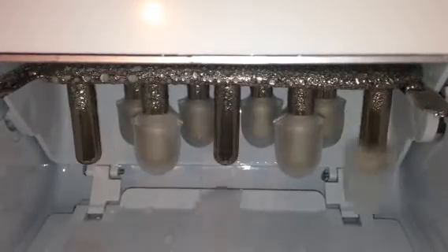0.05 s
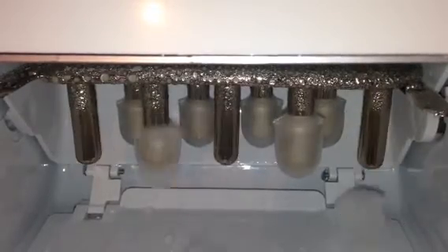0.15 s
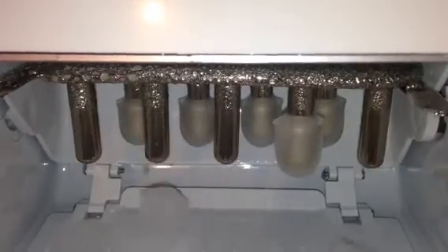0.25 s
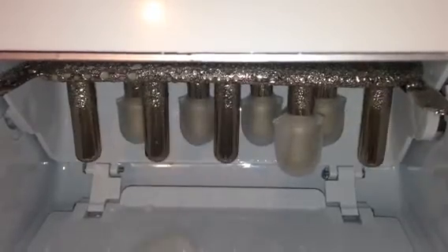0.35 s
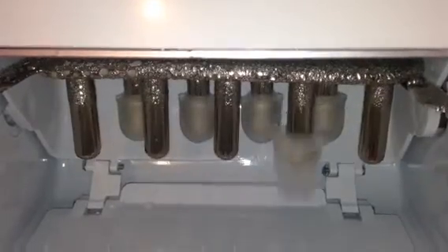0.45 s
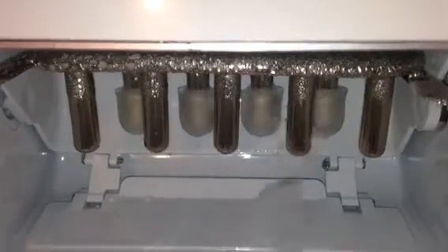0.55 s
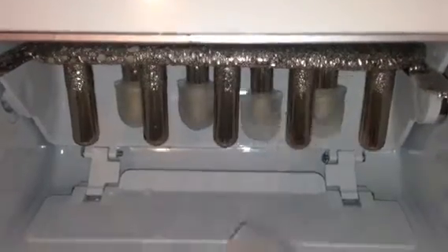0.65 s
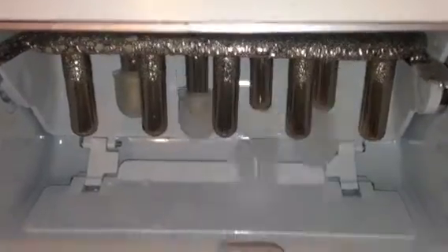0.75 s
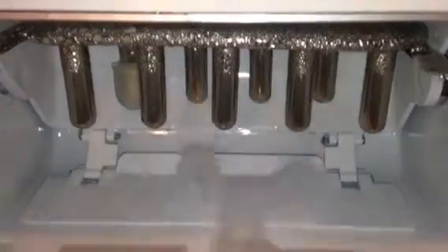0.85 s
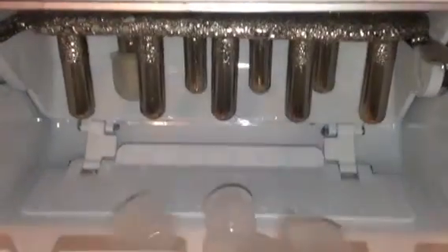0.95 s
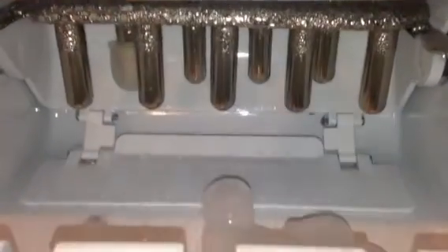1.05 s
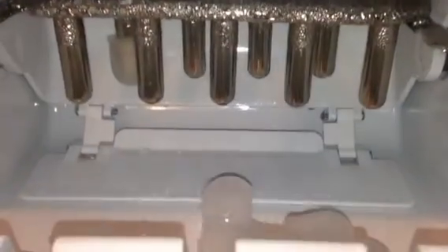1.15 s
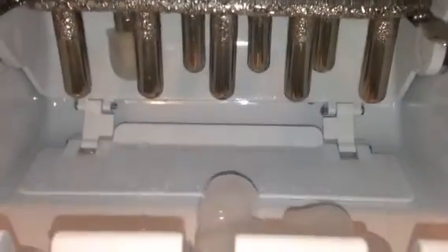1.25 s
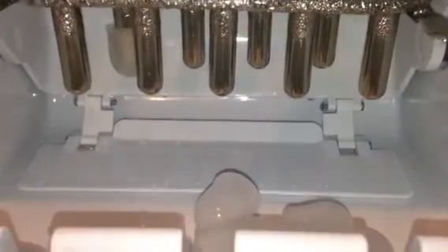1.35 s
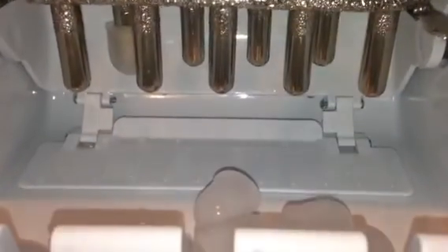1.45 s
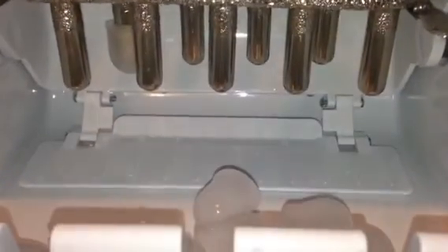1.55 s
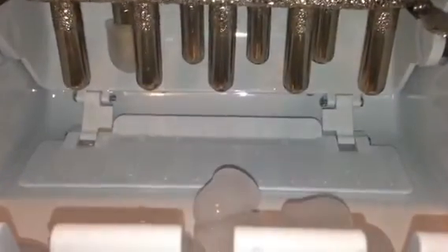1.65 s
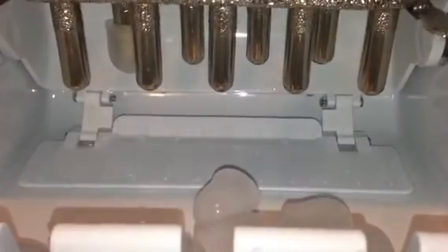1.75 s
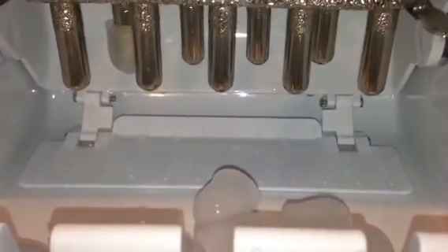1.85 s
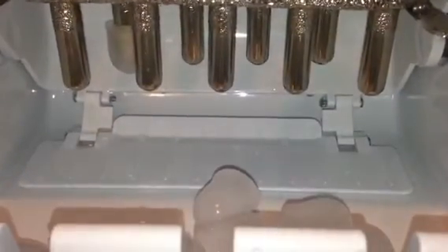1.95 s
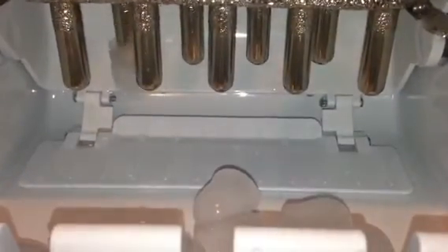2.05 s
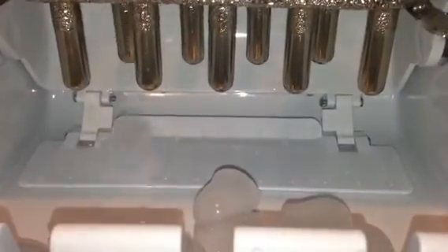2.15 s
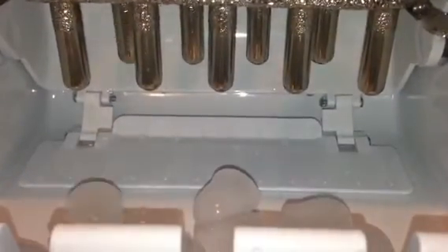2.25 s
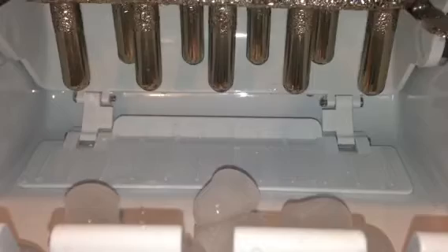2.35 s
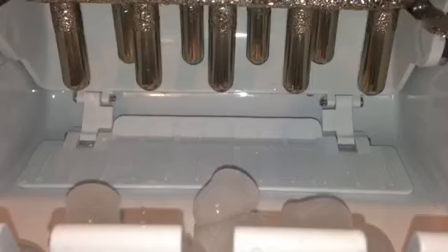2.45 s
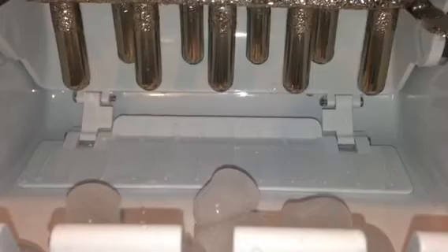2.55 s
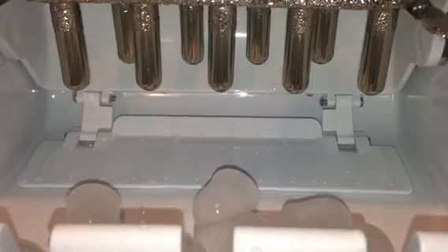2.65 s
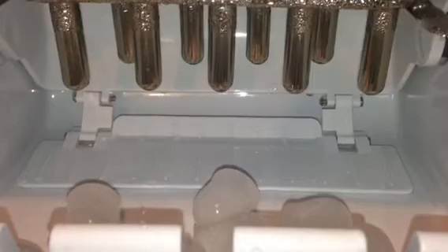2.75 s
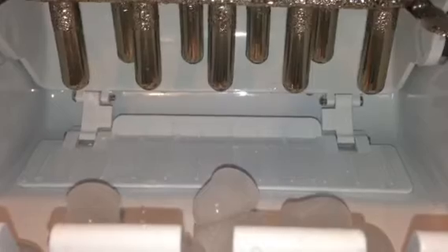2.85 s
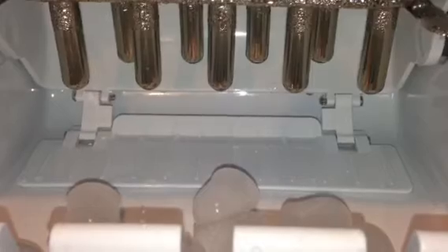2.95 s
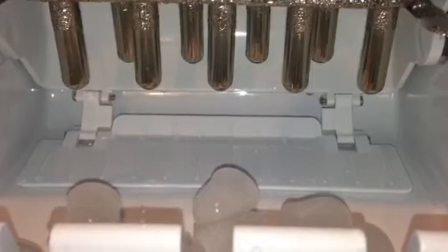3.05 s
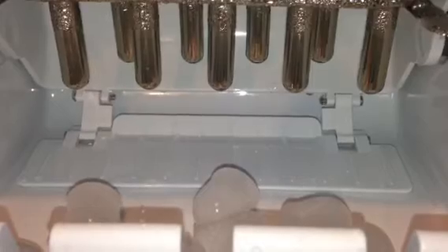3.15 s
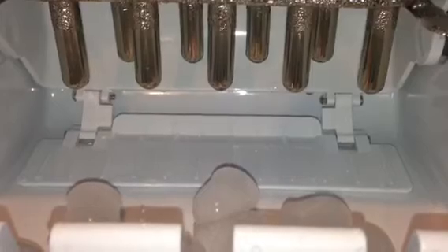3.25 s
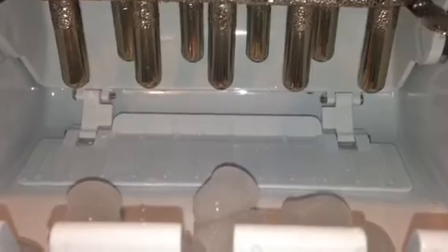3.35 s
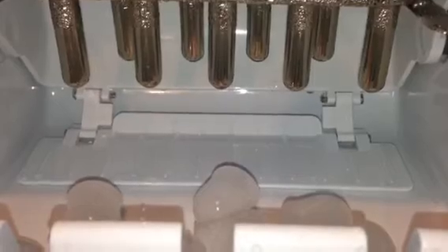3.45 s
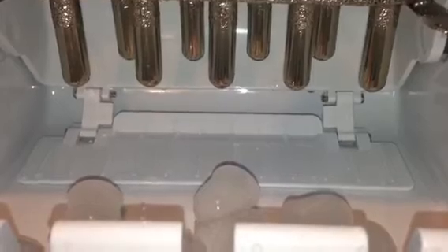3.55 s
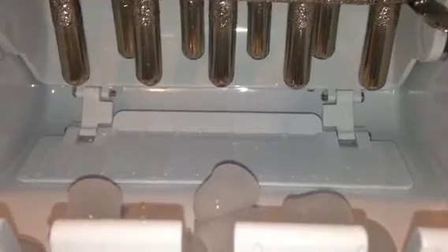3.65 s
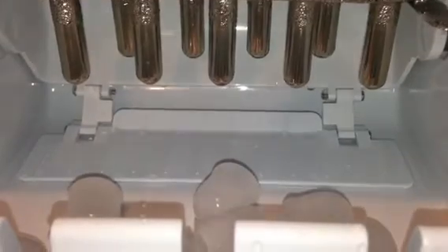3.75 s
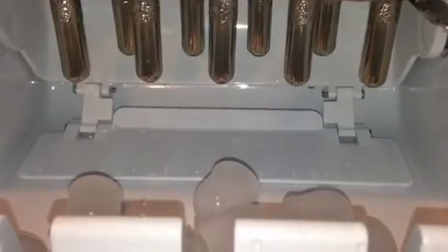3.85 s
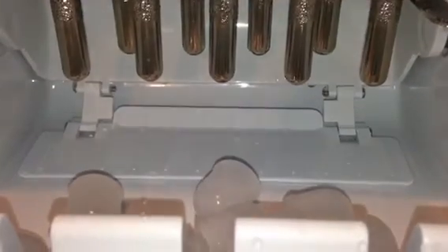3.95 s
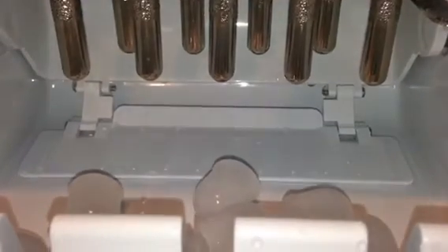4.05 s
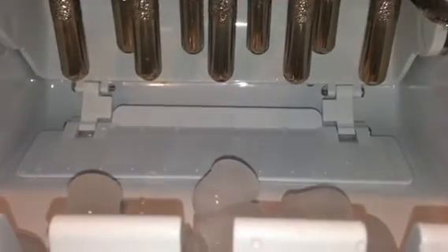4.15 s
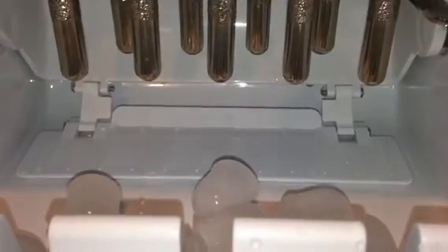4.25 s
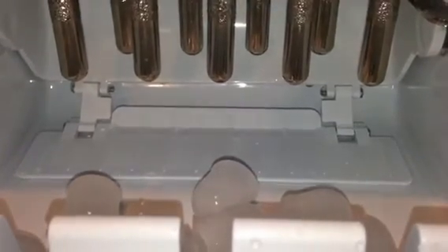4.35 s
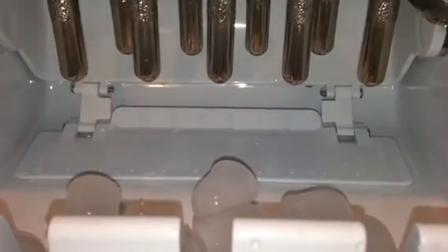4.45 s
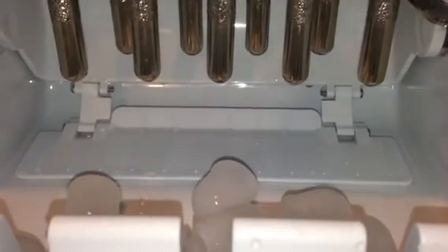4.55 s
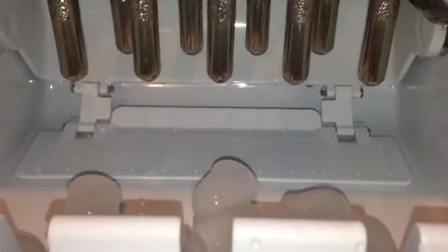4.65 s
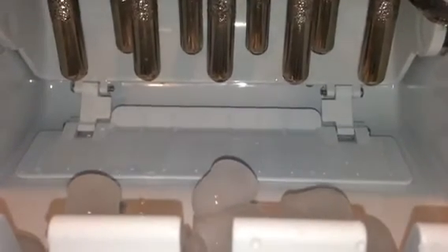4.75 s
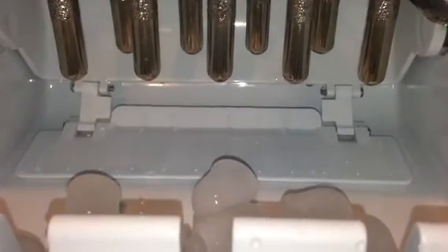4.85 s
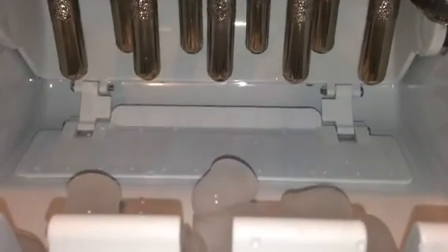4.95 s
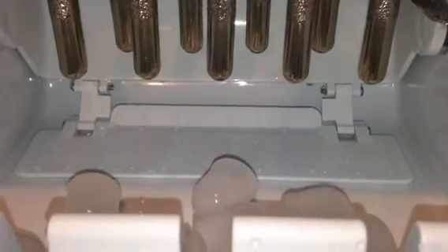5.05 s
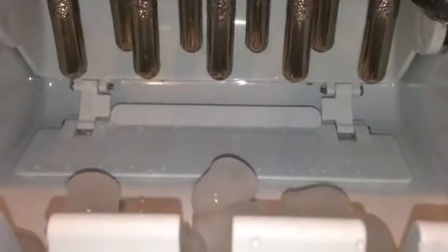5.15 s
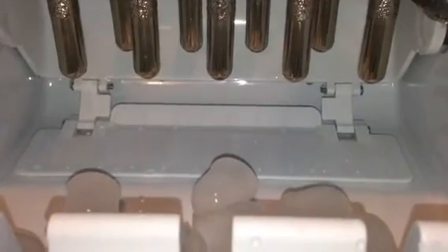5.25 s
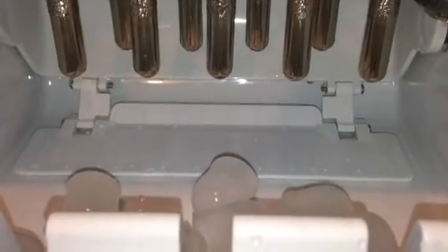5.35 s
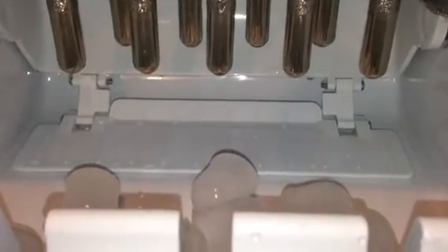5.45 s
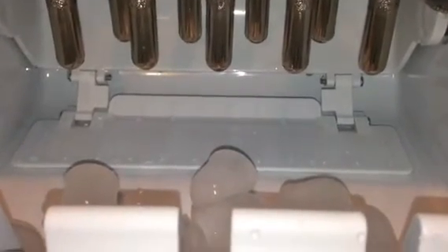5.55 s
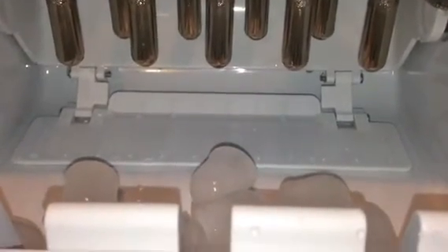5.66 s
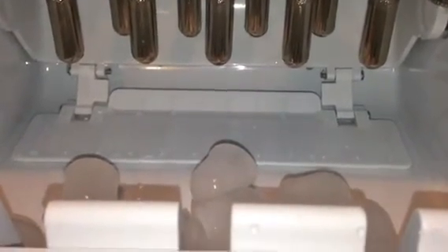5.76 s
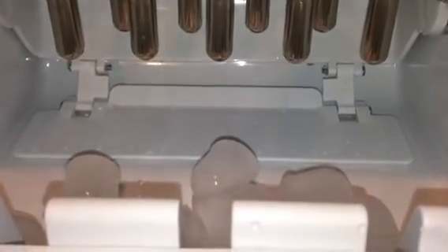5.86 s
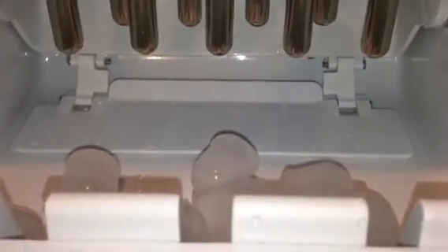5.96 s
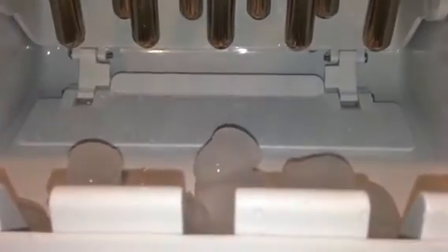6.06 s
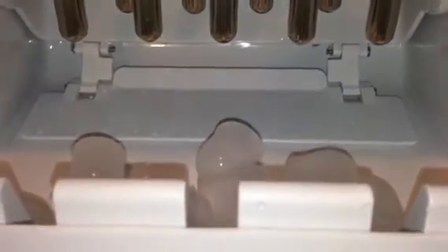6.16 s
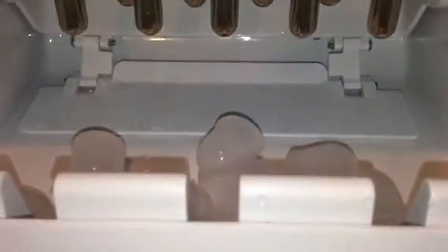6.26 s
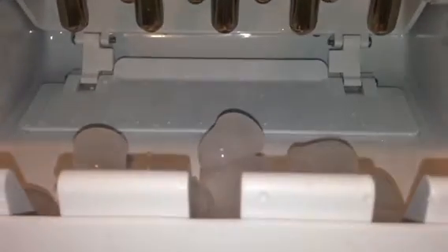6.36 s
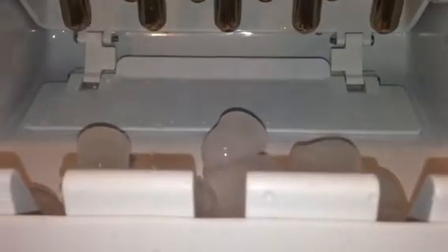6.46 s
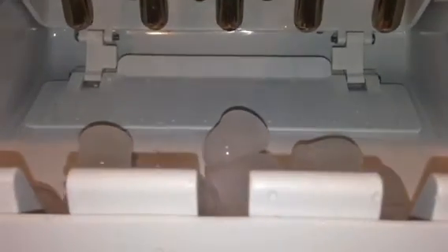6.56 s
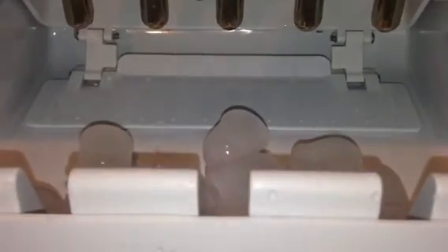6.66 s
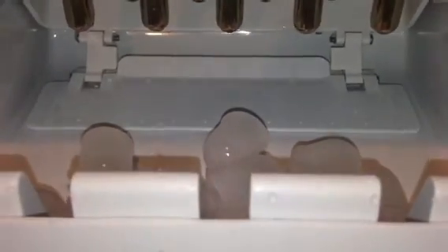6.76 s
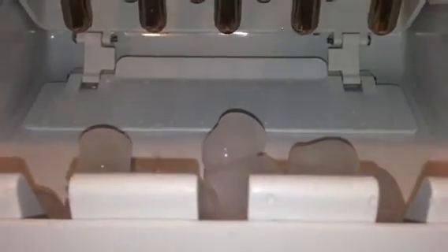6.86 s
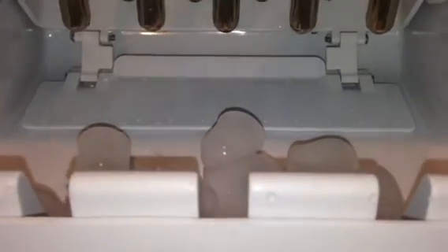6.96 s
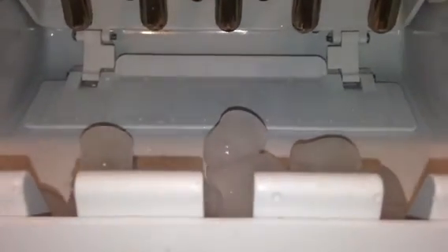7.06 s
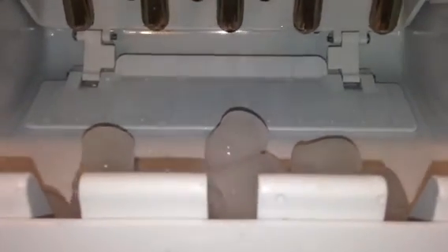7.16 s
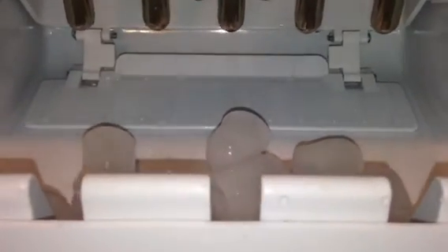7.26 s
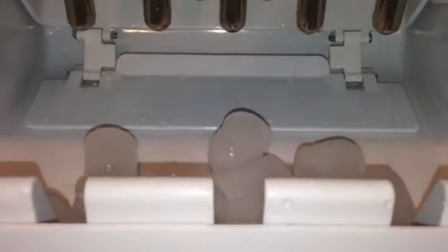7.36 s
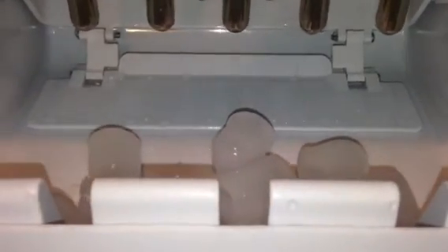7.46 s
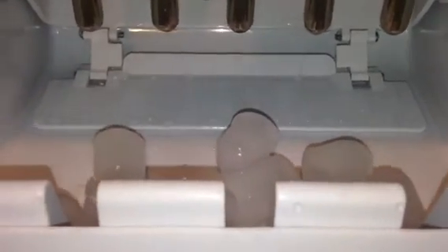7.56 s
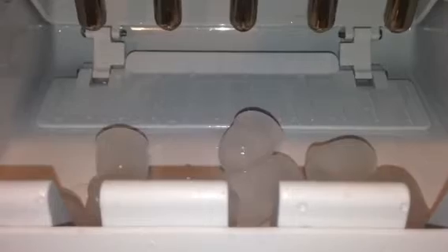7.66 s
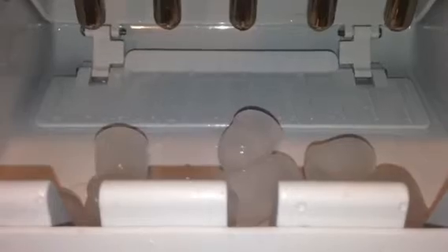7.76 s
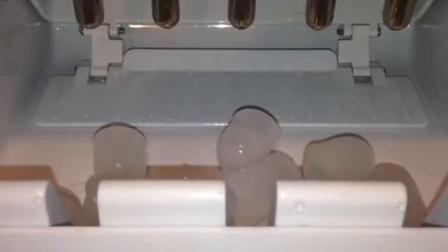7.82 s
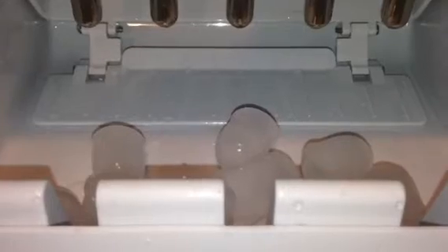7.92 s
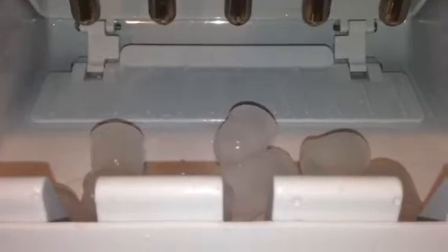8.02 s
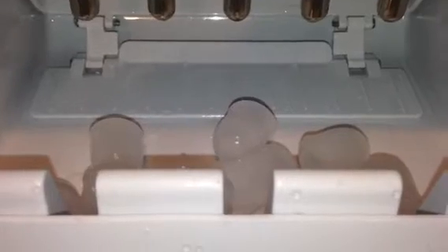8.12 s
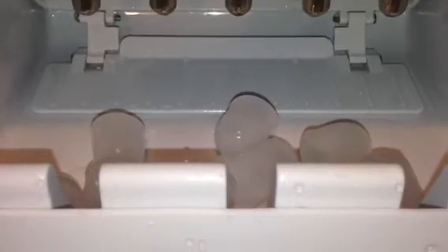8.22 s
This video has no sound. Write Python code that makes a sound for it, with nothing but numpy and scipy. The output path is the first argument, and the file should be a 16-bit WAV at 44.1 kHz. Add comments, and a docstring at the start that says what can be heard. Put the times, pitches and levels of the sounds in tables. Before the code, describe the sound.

Heard from just above an open ice maker, a quick run of cubes knocks and clacks onto a plastic scoop over a steady motor hum and gas hiss. One more cube clinks down a second later, and another shifts softly after that. A faint high whistle grows in the hiss until a valve closes with a clunk, cutting both off while the fan and compressor keep humming.

```python
"""Ice cubes clatter over a plastic scoop, above a hiss and a hum: a countertop ice maker ends its cycle,
heard from just above the open lid. Hot gas hisses and whistles through the evaporator while the cubes
slip off its prongs; each impact excites damped modes of the tub, the scoop or a cube.
The gas valve shuts with a clunk and the hiss stops; compressor and fan keep humming."""
import sys
import numpy as np
from scipy import signal
from scipy.fft import rfft, irfft, next_fast_len
from scipy.io import wavfile
from scipy.ndimage import uniform_filter1d, minimum_filter1d

SR = 44100
rng = np.random.default_rng(int(sys.argv[2]) if len(sys.argv) > 2 else 0)


def generate_wav(sig):
    """Save sig (samples, or channels by samples) to the path in sys.argv[1] as 16-bit PCM at SR."""
    pcm = np.round(np.clip(np.atleast_2d(sig).T, -1, 1) * 32767).astype(np.int16)
    wavfile.write(sys.argv[1], SR, pcm)


N = 365581
TIME = np.arange(N) / SR
SHUT_S = 7.546  # the gas valve closes

def gain_of(db):
    """Amplitude grows tenfold for every 20 dB."""
    return 10 ** (np.asarray(db) / 20)

def unit_rms(x):
    """Normalisation to a mean power of one."""
    return x / np.sqrt(np.mean(x ** 2) + 1e-20)

def add(mix, start_s, sound):
    """Superposition: a sound adds to the mix from its start time."""
    part = mix[max(round(start_s * SR), 0):][:len(sound)]
    part += sound[:len(part)]

def curve_at(points, hz, column=1):
    """Interpolation of a table column on a logarithmic frequency axis."""
    table = np.transpose(points)
    return np.interp(np.log(hz + 1), np.log(table[0] + 1), table[column])

def colouring(spectrum, resonances, hz, ripple_db, spacing_hz):
    """Gain of a cavity: a smooth spectrum, Lorentzian resonances and irregular standing-wave ripple."""
    peaks_db = sum(db / (1 + (2 * (hz - centre) / width) ** 2) for centre, width, db in resonances)
    knots = np.arange(0, SR / 2 + 200, spacing_hz)
    heights = rng.standard_normal(4096)[:len(knots)]
    standing_db = ripple_db * np.interp(hz, knots, heights) * hz / (hz + 1000)
    return gain_of(curve_at(spectrum, hz) + peaks_db + standing_db)

def cabinet_noise(spectrum, resonances=()):
    """Source and filter: white noise coloured by the cabinet, at rms 1."""
    size = next_fast_len(N)
    hz = np.fft.rfftfreq(size, 1 / SR)
    response = colouring(spectrum, resonances, hz, ripple_db=4.5, spacing_hz=45)
    return unit_rms(irfft(rfft(rng.standard_normal(size)) * response, size)[:N])

def drift(top_hz):
    """Slow sinusoids of random phase sum to an irregular wander of rms 1."""
    t = TIME[::128]
    rates = top_hz * np.geomspace(.1, 1, 20)
    slow = sum(np.sin(2 * np.pi * (hz * t + rng.random())) / np.sqrt(hz) for hz in rates)
    return np.interp(TIME, t, unit_rms(slow))

def minimum_phase(gain):
    """Causality: folding the cepstrum gives a response that cannot precede its excitation."""
    cepstrum = irfft(np.log(np.maximum(gain, 1e-5)))
    half = len(cepstrum) // 2
    cepstrum[1:half] *= 2
    cepstrum[half + 1:] = 0
    return np.exp(rfft(cepstrum))

def damped_mode(hz, db, t60, length_s=0.2):
    """Free vibration: a mode builds up within a cycle, then loses 60 dB every t60 seconds."""
    t = np.arange(round(length_s * SR)) / SR
    return gain_of(db - 60 * t / t60) * np.sin(2 * np.pi * hz * t) * (1 - np.exp(-2 * hz * t))

# The bands of an impact: thud, knock, crack and snap. Each row: lower edge in Hz, upper edge in Hz.
IMPACT_BANDS = [(150, 900), (900, 3500), (3500, 7500), (7500, 16000)]
# Decay of an impact. Each row: frequency in Hz, early t60 in seconds, relative tail level in dB,
# tail t60 in seconds.
IMPACT_DECAY = [(400, 0.014, -14.5, 0.17), (1860, 0.053, -8, 0.13), (4000, 0.039, -22, 0.19),
                (10000, 0.031, -29.5, 0.19)]

def impacts(hits, spectrum, resonances, direct_gains, rise_s, tail_db, chatter_db, ripple_db, size=16384):
    """Impulse response: a direct pulse and a cloud of decaying reflections, with a level for each band."""
    t, hz, out = np.arange(size) / SR, np.fft.rfftfreq(size, 1 / SR), np.zeros(N)
    scatter, lumps = rng.standard_normal((len(hits), 2, size)).transpose(1, 0, 2)
    chatter = gain_of(chatter_db * unit_rms(uniform_filter1d(lumps, size=100)))
    scatter = scatter * (1 - np.exp(-t / rise_s)) * chatter
    bin_hz, age, frames = signal.stft(scatter, SR, nperseg=128)
    t60, tail, tail_t60 = (curve_at(IMPACT_DECAY, bin_hz, column)[:, None] for column in (1, 2, 3))
    decay = np.hypot(gain_of(-60 * age / t60), gain_of(tail + tail_db - 60 * age / tail_t60))
    reflections = rfft(signal.istft(frames * decay, SR, nperseg=128)[1][:, :size])
    pulse = np.exp(-2j * np.pi * hz * .0007)  # arrives after 0.7 ms
    body = colouring(spectrum, resonances, hz, ripple_db, spacing_hz=106.2)
    attack = round(.008 * SR)  # a band's level is that of its first 8 ms
    for k, ((low, high), direct) in enumerate(zip(IMPACT_BANDS, direct_gains)):
        band = 1 / np.sqrt((1 + (low / (hz + 1)) ** 10) * (1 + (hz / high) ** 10))
        responses = irfft((reflections + direct * pulse) * minimum_phase(band * body))
        for (start_s, *band_db), response in zip(hits, responses):
            add(out, start_s, gain_of(band_db[k]) * response / np.std(response[:attack]))
    return out

def contact(start_s, db, thud_db, hardness):
    """A harder contact carries more treble. Returns the start and the levels of the four bands."""
    crack_db = db - 3.5 + 1.6 * hardness  # the tilt acts over 1.6 octaves
    snap_db = db - 10 + 2.34 * hardness
    return start_s, db + thud_db, db, crack_db, snap_db

def rebounds(landings, delay_s=0.017, scatter_s=0.005, loss_db=14, scatter_db=5):
    """Inelastic collision: after landing, each cube rocks back onto the plastic once, more weakly."""
    chance = rng.uniform(-1, 1, (len(landings), 2))
    return [(s + delay_s + scatter_s * late, db - loss_db + scatter_db * loud, thud_db, hardness)
            for (s, db, thud_db, hardness), (late, loud) in zip(landings, chance)]

# Spectrum of the struck plastic tub. Each row: frequency in Hz, relative spectral level in dB.
TUB_SPECTRUM = [(50, -42), (130, -32), (230, -23.5), (330, -8), (460, 2), (570, -3.5), (690, -6),
                (880, -18.5), (1250, -11.5), (3500, -11.5), (6000, -8.5), (7300, -13), (10000, -20.5),
                (12000, -28.5), (15500, -33)]
# Narrow resonances of the tub. Each row: centre in Hz, width in Hz, lift in dB.
TUB_RESONANCES = [(420, 50, 3), (530, 40, 2), (678, 40, 5), (1545, 50, 6), (1745, 50, 9), (1900, 70, 5),
                  (2470, 70, 9), (2680, 55, 7), (3108, 65, 7), (3338, 55, 6), (3940, 80, 5), (4943, 40, 7),
                  (5967, 55, 8)]
# Cubes landing on the plastic. Each row: start in seconds, strength in dB, thud in dB above that
# strength, hardness as treble tilt in dB per octave.
LANDINGS = [(0.018, -21, 5, -0.5), (0.078, -29, 7.5, -0.5), (0.0894, -20.5, -1.5, -2.5),
            (0.1217, -18.5, 5.5, -5), (0.135, -29.5, -8, 3.5), (0.2027, -16.5, 4.5, -4),
            (0.2068, -17, 1, 0.5), (0.249, -24, 4, 2.5), (0.2992, -18.5, 1.5, 0), (0.343, -17, 4.5, -4),
            (0.3507, -22, -4, 2.5), (0.377, -21, -16, 1), (0.39, -25, -7, 2.5), (0.453, -33, 7, 4),
            (0.604, -20, 11.5, -2), (0.685, -25.5, 5, 0.5), (0.696, -17.5, 3, 0.5), (0.733, -27, 2, -1),
            (0.803, -23.5, 0, 1.5), (0.819, -17, -2, 3), (0.852, -23.5, 5.5, -2), (0.9393, -30.5, 8.5, 8.5),
            (0.955, -19.5, 4, 2.5), (0.97, -18, -9, 0), (0.991, -19, 7, 5.5), (1.003, -23, -16, 1),
            (1.019, -20.5, 6.5, 3.5), (1.051, -26.5, -6, 3.5), (1.067, -21.5, -2.5, 2.5),
            (2.16, -27.5, 4, 7), (2.187, -26.5, 6, 3.5), (2.196, -20.5, -10, 3.5), (2.2242, -23.5, 0, 0.5),
            (2.245, -28.5, 3.5, -1), (2.294, -17.5, 0.5, 1.5), (2.33, -33.5, 3.5, 6.5),
            (2.338, -28, 7.5, -2), (4.993, -39, -2, -1)]
# Cubes striking one another. Each row: start in seconds, strength in dB, hardness in dB per octave,
# pitch of the cube's ring in Hz, relative level of that ring in dB.
CUBE_CLACKS = [(0.3621, -17.5, -1.5, 4040, 14), (0.4241, -12.5, -1, 3160, 4), (0.469, -16, 1.5, 4700, 16),
               (0.517, -23.5, 0, 5860, 19.5), (0.5869, -17, 3.5, 6030, 7), (0.62, -27.5, 0.5, 2480, 12),
               (0.783, -22, -5, 2600, 8), (0.875, -26, 4, 4300, 5), (0.8967, -12.5, 1.5, 6160, 8.5),
               (0.914, -14, -0.5, 3930, 10), (0.979, -18, 1, 3400, 9), (1.105, -18.5, -4, 3440, 13),
               (1.187, -42.5, -4, 3570, 16), (1.229, -36.5, 1, 6100, 15), (5.0112, -31, -4, 3800, 9),
               (5.0136, -36, 0.5, 1732, 17), (5.058, -50, 1, 4180, 15)]

def ice(level_db=2, clack_thud_db=-7, scoop_hz=1723, scoop_db=7, ring_db=-3, split=0.082):
    """Impact excitation: cubes strike plastic and each other; scoop or cube rings in a mode cluster."""
    landings = LANDINGS + rebounds(LANDINGS)
    hits = [contact(*row) for row in landings]
    hits += [contact(s, db, clack_thud_db, hardness) for s, db, hardness, *_ in CUBE_CLACKS]
    out = impacts(hits, TUB_SPECTRUM, TUB_RESONANCES, direct_gains=(9.2, 2.5, 1.4, 2.2),
                  rise_s=0.00052, tail_db=2.5, chatter_db=1, ripple_db=2.5)
    spots = rng.uniform(-0.83, 1, len(landings))  # the scoop's pitch varies with the spot struck
    rings = [(s, scoop_hz * (1 + 0.06 * spot), db + scoop_db) for (s, db, *_), spot in zip(landings, spots)]
    rings += [(s, hz, db + above_db) for s, db, _, hz, above_db in CUBE_CLACKS]
    # A lopsided body has neighbouring modes on either side of the main one.
    offsets = np.array([-1.55, -0.72, 1.14, 1.3]) + rng.random((len(rings), 4)) - .5
    for (s, hz, db), offset in zip(rings, offsets):
        add(out, s + 0.00103, damped_mode(hz, db + ring_db, t60=70 / hz))  # high modes die sooner
        for side_hz in hz * np.exp(split * offset):
            add(out, s + 0.0025 * rng.random(), damped_mode(side_hz, db + ring_db - 5, t60=45 / side_hz))
    return gain_of(level_db) * out

def whistle(hz, width_hz):
    """Narrowband resonance: noise passes three poles, each width_hz wide, and is shifted up to hz."""
    pole = np.exp(-np.pi * width_hz / SR)
    turbulence = rng.standard_normal(N) + 1j * rng.standard_normal(N)
    envelope = signal.lfilter([1], np.poly([pole] * 3), turbulence)
    carrier = np.exp(2j * np.pi * np.cumsum(hz * np.ones(N)) / SR)
    return unit_rms((envelope * carrier).real)

# Gas rushing through the pipes. Each row: frequency in Hz, relative spectral level in dB.
GAS_SPECTRUM = [(300, -1.5), (600, 7.5), (1000, 0), (1600, -5.5), (2400, -2), (3100, 4.5), (4200, -3.5),
                (5400, -5.5), (6400, 0.5), (8500, -3.5), (9700, -9.5), (12000, -2.5), (14500, -36.5),
                (15300, 4)]
# Pipe resonances in the hiss. Each row: centre in Hz, width in Hz, lift in dB.
PIPE_RESONANCES = [(1494, 290, 9.5), (3000, 460, 3.5), (4310, 160, 5), (5973, 186, 11.5), (6404, 210, 12),
                   (7380, 114, 7), (7620, 120, 7.5), (8610, 310, 4.5), (10460, 240, 7)]
# Valve whistles of steady pitch. Each row: centre in Hz, pole width in Hz, relative level in dB.
VALVE_WHISTLES = [(12750, 300, -13), (13450, 400, -1), (14300, 350, -16), (15200, 150, -11)]
# Envelope of the gliding whistle. Each row: time in seconds, relative level in dB.
GLIDE_ENVELOPE = [(2.4, -63), (3.1, -54), (5.2, -61.5), (7.5, -49.5)]

def hot_gas(hiss_db=-41, whistle_db=-46.5, glide_hz=(11200, 12200), flutter_db=.5, closing_s=.015):
    """Flow noise excites resonances of pipes and valve: a hiss and whistles, until the valve shuts."""
    # The steady whistles swell at 7.5 dB/s until 3.7 s, hold, and fade at 7 dB/s from 6.3 s.
    swell_db = whistle_db - 7.5 * np.maximum(3.7 - TIME, 0) - 7 * np.maximum(TIME - 6.3, 0)
    steady = gain_of(swell_db) * sum(gain_of(db) * whistle(hz, width) for hz, width, db in VALVE_WHISTLES)
    rising_hz = glide_hz[0] + (glide_hz[1] - glide_hz[0]) * (TIME / SHUT_S) ** 2
    glide_db = np.interp(TIME, *np.transpose(GLIDE_ENVELOPE)) - 1
    glide = gain_of(glide_db) * whistle(rising_hz, width_hz=750)
    flutter = gain_of(flutter_db * drift(25))
    growth = gain_of(hiss_db - 0.19 * (SHUT_S - TIME))  # the hiss grows by 0.19 dB/s
    hiss = growth * cabinet_noise(GAS_SPECTRUM, PIPE_RESONANCES)
    opening = np.exp(-np.maximum(TIME - SHUT_S, 0) / closing_s)
    return opening * flutter * (hiss + steady + glide)

# Steady tones of compressor and fan. Each row: frequency in Hz, rms level in dB.
MOTOR_TONES = [(59.2, -61), (161.5, -61.5), (280.7, -50), (321.3, -49), (409.1, -52.5), (560, -52.5),
               (802.1, -65.5), (963.6, -60), (2044, -57), (3025, -66.5), (3210, -64.5)]
# Slow swell of the strongest motor tone. Each row: time in seconds, rms level in dB.
DRONE_ENVELOPE = [(0, -55), (2.6, -59.5), (3.2, -49), (4.8, -47.5), (7.4, -46), (8.29, -49.5)]

def motor_hum(drone_hz=524.7, waver_db=1.17, wander_cycles=0.084):
    """Periodic motion radiates a line spectrum; each motor tone wavers in level and phase."""
    drone_db = np.interp(TIME, *np.transpose(DRONE_ENVELOPE))
    out = np.zeros(N)
    for hz, db in MOTOR_TONES + [(drone_hz, drone_db)]:
        amplitude = np.sqrt(2) * gain_of(db + waver_db * drift(24))
        out += amplitude * np.sin(2 * np.pi * (hz * TIME + wander_cycles * drift(7.3)))
    return out

# Air from the fan. Each row: frequency in Hz, relative spectral level in dB.
FAN_SPECTRUM = [(25, -49), (60, -56), (130, -10.5), (190, -7), (250, -8), (390, 0.5), (500, -4),
                (660, -2.5), (850, -23.5), (1200, -22), (1600, -17), (3100, -23), (5500, -32),
                (15000, -43.5)]
# Hollows of the cabinet. Each row: centre in Hz, width in Hz, lift in dB (negative for a notch).
CABINET_HOLLOWS = [(315, 49, 2), (413, 62, 1), (619, 17, 6.5), (1570, 220, 4), (1810, 50, -18),
                   (1950, 59, 11), (3070, 290, 3)]

def fan_air(level_db=-43.5, gust_db=1.54):
    """Cavity resonance: the cabinet's hollows colour the gusting, broadband rush of the fan."""
    return gain_of(level_db + gust_db * drift(13)) * cabinet_noise(FAN_SPECTRUM, CABINET_HOLLOWS)

def rumble(level_db=-56, swell_db=3):
    """Slow amplitude modulation makes a low noise come and go."""
    spectrum = [(35, -32), (70, 5.5), (170, 6.0), (280, -6.5), (1000, -70)]  # Hz, relative dB
    return gain_of(level_db + swell_db * drift(4)) * cabinet_noise(spectrum)

# Modes of a clear clink. Each row: frequency in Hz, relative level in dB, t60 in seconds.
CLINK_MODES = [(318, -18, 0.13), (613, -14, 0.064), (1230, -28.5, 0.13), (2000, -10.5, 0.074),
               (3025, -17, .06), (3770, -15, 0.044), (5230, -18, 0.054), (6470, -19, 0.045),
               (7100, -23, 0.067), (10080, -30, .025)]

def clink(start_s=2.160956, level_db=2.5):
    """Modal superposition: a late cube lands cleanly and rings in all its modes at once."""
    out = np.zeros(N)
    add(out, start_s, sum(damped_mode(hz, db, t60) for hz, db, t60 in CLINK_MODES))
    return gain_of(level_db) * out

# The plunger stirs, then seats. Each row: start in seconds, then thud, knock, crack and snap in relative dB.
PLUNGER_HITS = [(7.534, -34.5, -42, -43, -43), (7.546, -23.5, -23, -21, -20.5)]
# Spectrum of the clunk. Each row: frequency in Hz, relative spectral level in dB.
CLUNK_SPECTRUM = [(60, -53), (170, -21), (250, -4), (420, 5), (700, 3), (1000, -29.5), (1400, -16.5),
                  (2000, -14), (2800, -14), (4000, -5), (6000, -3), (8700, -2), (12400, -16), (15500, -16)]
# Modes of the cabinet. Each row: frequency in Hz, relative level in dB, t60 in seconds.
CABINET_MODES = [(344, -18, 0.1), (428, -9, 0.11), (558, -15, 0.076), (680, -20, 0.068), (736, -20, 0.058),
                 (1345, -33, 0.16), (1950, -20, 0.06)]

def valve_clunk(level_db=3.5, spread_s=0.00442):
    """Structure-borne sound: the plunger snaps onto its seat and the cabinet rings, panel after panel."""
    out = impacts(PLUNGER_HITS, CLUNK_SPECTRUM, [], direct_gains=(1.9, 1.7, 0.7, 2.2),
                  rise_s=0.0015, tail_db=5.5, chatter_db=-1.5, ripple_db=1.5)
    for hz, db, t60 in CABINET_MODES:
        add(out, SHUT_S + spread_s * rng.random(), damped_mode(hz, db, t60, length_s=0.5))
    return gain_of(level_db) * out

def scene():
    """Linear superposition: the transients and the sustained sounds add in one channel."""
    transients = ice() + clink() + valve_clunk()
    return (transients + hot_gas() + motor_hum() + fan_air() + rumble())[None]

def record(dry, threshold_db=-19, squeeze=0.43, hold_s=0.18, recovery_db_per_s=60, ceiling=0.8):
    """Dynamic compression: the gain dips briefly after loud knocks; soft clipping and a low-pass follow."""
    power_db = 10 * np.log10(abs(uniform_filter1d(dry[0] ** 2, size=300)) + 1e-12)
    hold = round(hold_s * SR)
    held_db = -minimum_filter1d(-power_db, size=hold, origin=(hold - 1) // 2, mode="nearest")
    fall_db = TIME * recovery_db_per_s
    released_db = np.maximum.accumulate(held_db + fall_db) - fall_db
    over_db = np.maximum(released_db - threshold_db, 0)
    ducked = dry / gain_of(squeeze * uniform_filter1d(over_db, size=200))
    rounded = ducked / (1 + (ducked / ceiling) ** 6) ** (1 / 6)
    lowpass = signal.firwin(511, cutoff=15380, window=("kaiser", 8), fs=SR)
    return signal.oaconvolve(rounded, lowpass[None], "same")

dry = scene()
out = record(dry)
generate_wav(out)
```